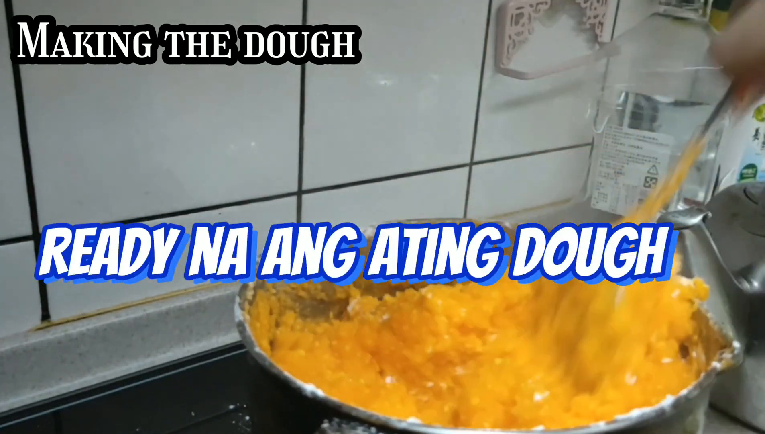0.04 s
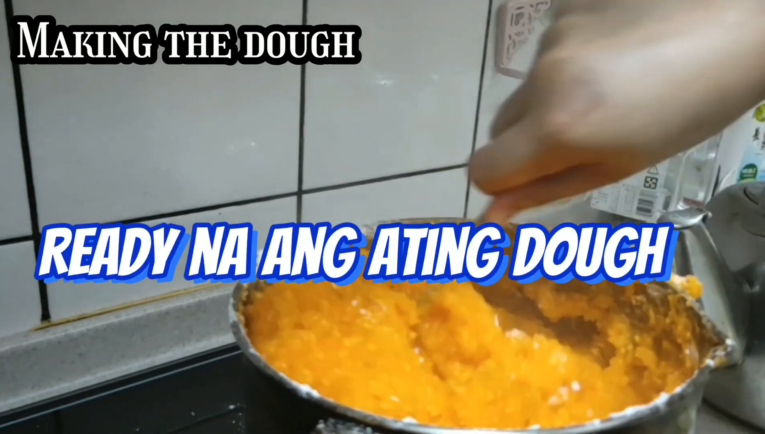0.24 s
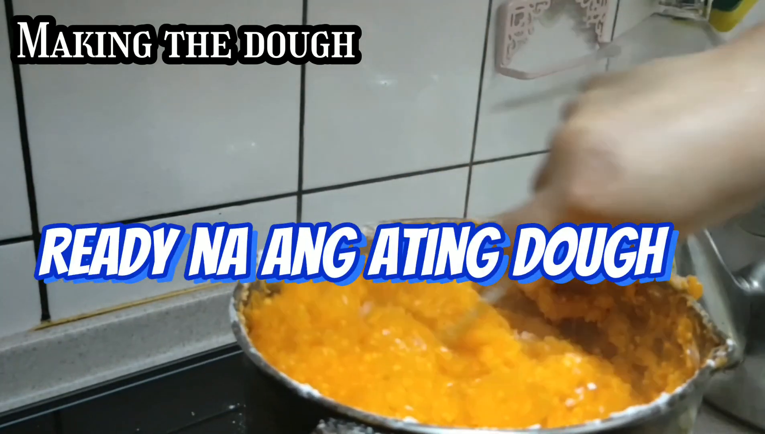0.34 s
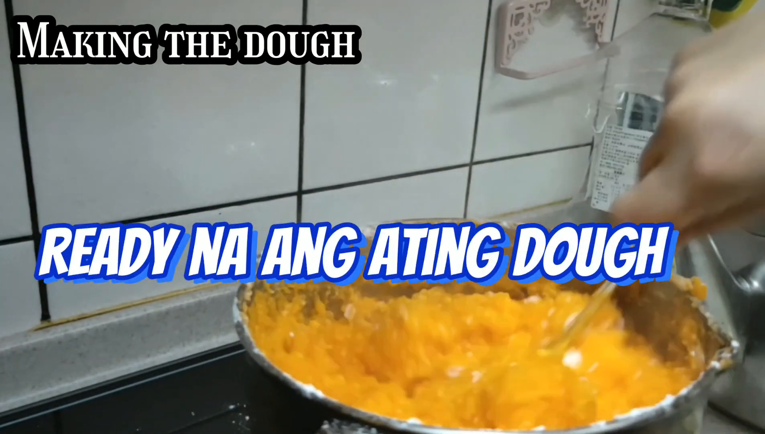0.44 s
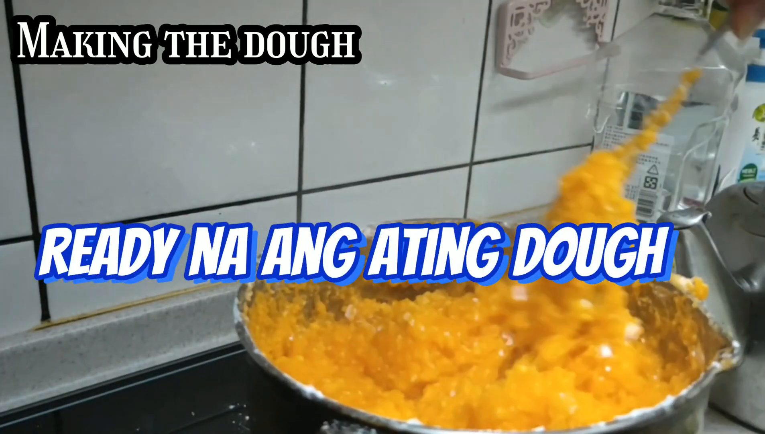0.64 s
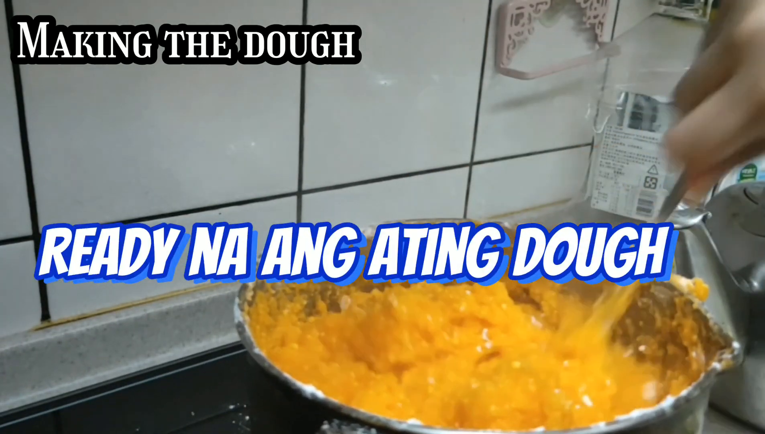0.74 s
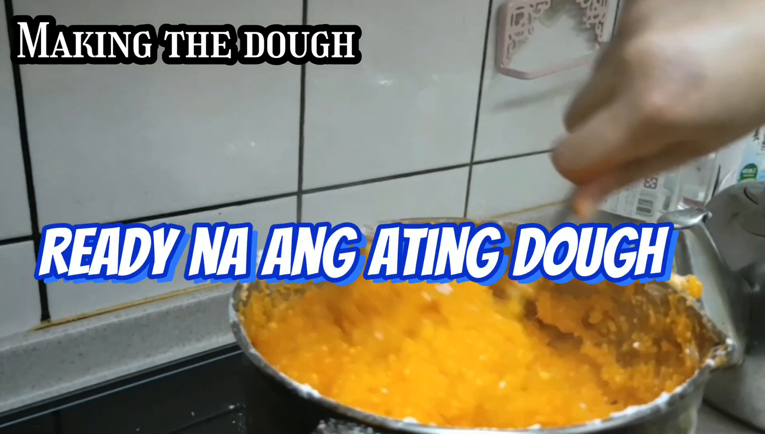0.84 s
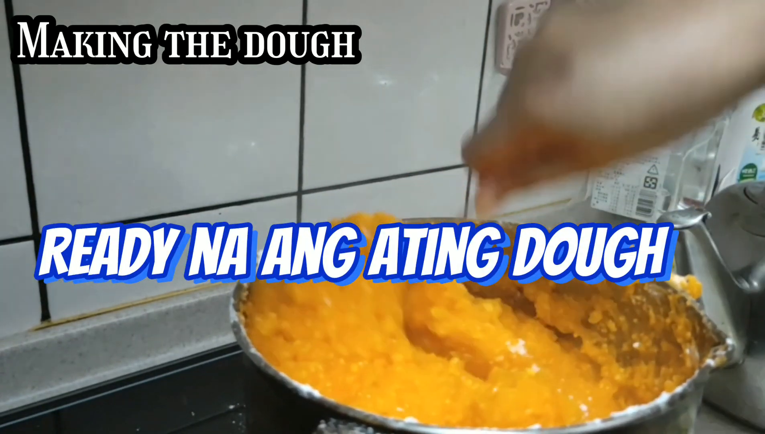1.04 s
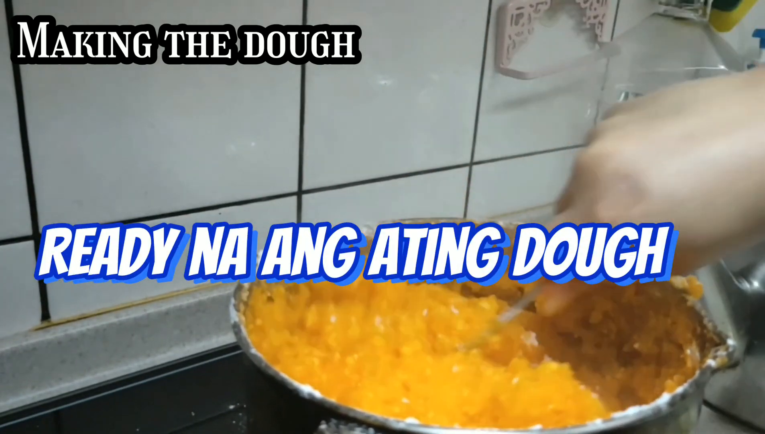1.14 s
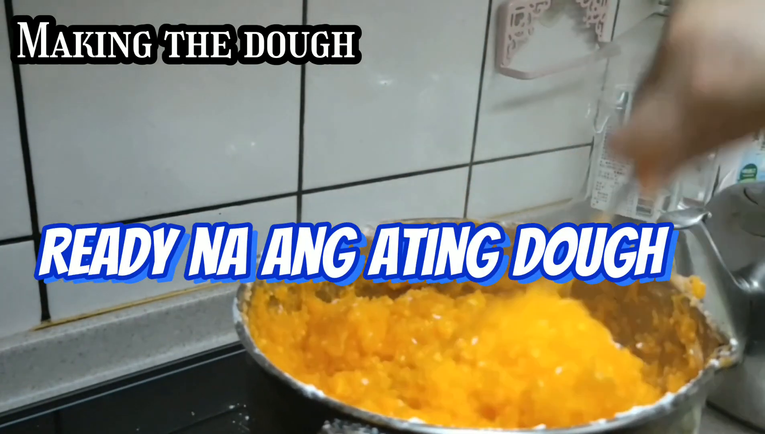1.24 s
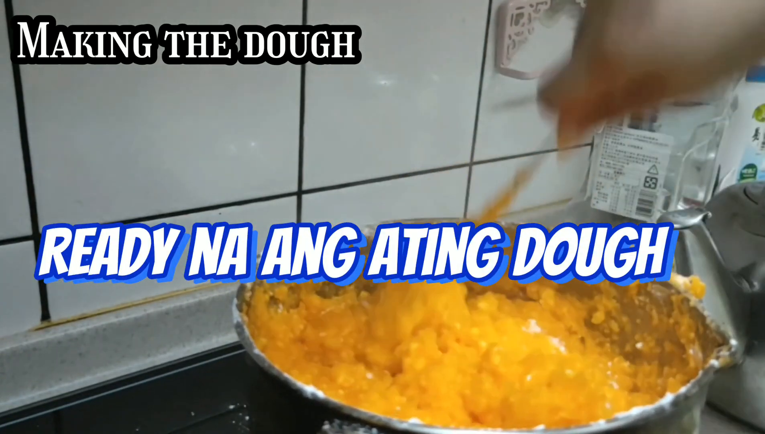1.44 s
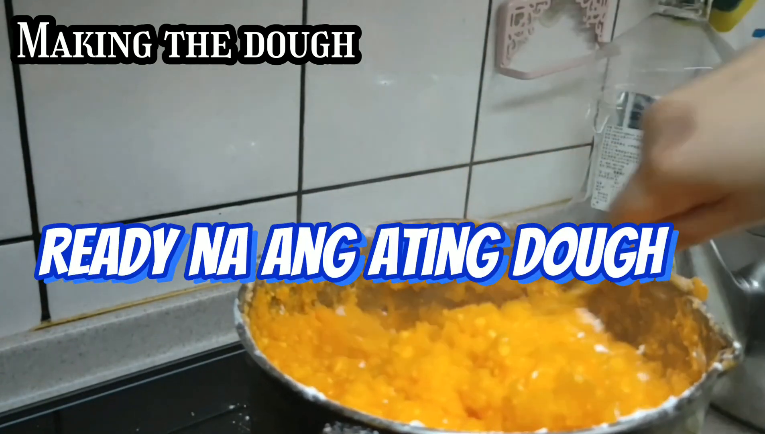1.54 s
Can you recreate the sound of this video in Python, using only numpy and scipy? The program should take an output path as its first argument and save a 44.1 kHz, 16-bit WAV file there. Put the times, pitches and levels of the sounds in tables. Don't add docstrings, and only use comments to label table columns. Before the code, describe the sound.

Thick dough being stirred in a metal pot, with irregular dull knocks, soft thuds and short scrapes

```python
import sys
import numpy as np
from scipy import signal
from scipy.fft import rfft, irfft, next_fast_len
from scipy.io import wavfile
from scipy.ndimage import uniform_filter1d

SR = 44100
rng = np.random.default_rng(int(sys.argv[2]) if len(sys.argv) > 2 else 0)


def wav_record(signal):
    frames = np.transpose(np.atleast_2d(signal))
    bounded = np.clip(frames, -1, 1)
    quanta = np.round(bounded * 32767).astype(np.int16)
    wavfile.write(sys.argv[1], SR, quanta)


def field_ratio(decibels):
    return 10 ** (np.asarray(decibels, dtype=float) / 20)


N = 70560

# frequency in Hz, t60 in seconds, level in dB when knocked, level in dB when thudded.
POT_MODES = [(103, 0.087, -7.5, -9), (144, 0.11, -9, -10.5), (211.5, 0.024, -8.5, 1),
             (265.2, 0.064, -6, -1.5), (392.8, 0.033, 0.5, 1.5), (543, 0.046, 1, -2),
             (651, 0.033, -7.5, -4), (859, 0.023, -1.5, 8), (993, 0.023, 2.5, 6.5), (1160, 0.039, 2, 4.5),
             (1340, 0.023, -0.5, 8), (1738, 0.058, -15, -2), (2065, 0.02, 0.5, -14),
             (3040, 0.029, -21, -11)]
KNOCKED_DB, THUDDED_DB = np.array(POT_MODES).T[2:]


def unit(x):
    return x / np.sqrt(np.mean(x ** 2))


def fade(t, t60):
    return (t >= 0) * field_ratio(-60 * np.maximum(t, 0) / t60)


def butter(x, order, hz, kind="low"):
    return signal.sosfilt(signal.butter(order, hz, kind, fs=SR, output="sos"), x)


def shape(x, points, lag=0):
    n = next_fast_len(len(x) + 4096)
    f = np.arange(n // 2 + 1) * SR / n + 1
    hz, db = np.array(points).T
    gain = field_ratio(np.interp(np.log(f), np.log(hz + 1), db))
    delay = np.exp(-2j * np.pi * f * lag / SR)
    return irfft(rfft(x, n) * gain * delay, n)[:len(x)]


def walk(rate):
    k = int(SR / rate)
    return unit(uniform_filter1d(uniform_filter1d(rng.standard_normal(N), k), k))


def hum():
    # frequency in Hz, level in dB per Hz.
    hum_colour = [(25, -11), (90, 11.5), (200, -7.5), (400, -9), (2000, -37), (7000, -51), (14000, -54)]
    level_db = -66
    first, second = [field_ratio(level_db) * unit(shape(rng.standard_normal(N), hum_colour)) for _ in range(2)]
    return first, 0.75 * first + 0.23 * second


def grit():
    grains_per_s, spread_db = 12000, 1.2
    hit = rng.random(N) < grains_per_s / SR
    size = field_ratio(spread_db * rng.exponential(size=N))
    return unit(hit * rng.standard_normal(N) * size)


def pot_wall(force, gains_db):
    out = 0
    for k, ((hz, t60, *_), db) in enumerate(zip(POT_MODES, gains_db)):
        pole = np.exp(2j * np.pi * hz / SR - np.log(1000) / (t60 * SR))
        ring = signal.lfilter([1], [1, -pole], force).imag
        out = out + (-1) ** k * field_ratio(db) * ring
    return out


def dough_drag():
    # time in seconds, load in dB, contact in ms.
    drag = [(0, -50, 1.37), (0.052, -62.5, 0.39), (0.121, -67.5, 5.5), (0.221, -67.5, 2.5),
            (0.402, -45.5, 1), (0.532, -52.5, 0.95), (0.619, -50.5, 1.14), (.7, -72, 1.7), (.76, -76, 1.9),
            (.86, -66.5, 0.34), (1.0, -53, 2.3), (1.068, -47.5, 0.32), (1.13, -56.5, 0.28),
            (1.161, -62.5, 0.16), (1.243, -35.5, 0.44), (1.288, -60, 0.54), (1.431, -62.5, 2.64),
            (1.6, -65.5, 4.7)]
    seconds, load_db, contact_ms = np.array(drag, float).T
    t = np.arange(N) / SR
    ring = pot_wall(grit() * field_ratio(1.5 * walk(30)), THUDDED_DB)
    steps_ms = np.array([.25, .5, 1, 2, 4])
    versions = [unit(butter(ring, 3, 500 / ms)) for ms in steps_ms]
    versions[0] = unit(butter(versions[0], 2, 600, "high"))
    contact = np.clip(np.interp(t, seconds, contact_ms), .25, 4)
    place = np.interp(np.log(contact), np.log(steps_ms), np.arange(5))
    mix = sum(np.sqrt(np.clip(1 - abs(place - k), 0, 1)) * v for k, v in enumerate(versions))
    return mix * field_ratio(np.interp(t, seconds, load_db))


def resonances(x, table):
    out = 0
    for k, (hz, width, db) in enumerate(table):
        b, a = signal.iirpeak(hz, hz / width, fs=SR)
        twice = signal.lfilter(b, a, signal.lfilter(b, a, x))
        out = out + (-1) ** k * field_ratio(db) * twice
    return out


def spoon_edge(x, bright_db):
    # frequency in Hz, width in Hz, level in dB.
    low_modes = [(1375, 1500, -2.5), (1944, 895, 4), (2272, 470, 5.5), (2870, 1480, 0.5)]
    # frequency in Hz, width in Hz, level in dB.
    high_modes = [(4580, 2630, -11.5), (5290, 1380, -3.5), (6943, 2270, -4), (8020, 2660, -8.5),
                  (10600, 3700, -19.5), (14950, 2900, -26)]
    return 4 * (resonances(x, low_modes) + field_ratio(bright_db) * resonances(x, high_modes))


def sliding():
    # time in seconds, pressure in dB, brightness in dB.
    slide = [(0, -66, 0.5), (.14, -69, 7.5), (0.202, -71.5, 19), (0.229, -74, 12.5), (0.448, -61, -12),
             (.515, -76, 9.5), (0.564, -60, 3.5), (0.601, -65.5, -0.5), (0.699, -79.5, 5.5),
             (0.754, -72, -53), (.86, -65.5, 8), (0.998, -65, -2.5), (1.07, -66, 6.5), (1.17, -66.5, 6),
             (1.3, -66, 0.5), (1.431, -83.5, 5.5), (1.558, -60.5, 11.5), (1.6, -61.5, 12)]
    seconds, pressure_db, bright_db = np.array(slide, float).T
    flicker_db = 1.5
    t = np.arange(N) / SR
    noise = grit() * field_ratio(flicker_db * walk(40))
    rubbed = spoon_edge(noise, np.interp(t, seconds, bright_db))
    return field_ratio(np.interp(t, seconds, pressure_db)) * rubbed


def strikes(table, modes_db):
    strike_spread_db, rattle_db, clink_t60_s = 1.5, -8, 0.016
    out = np.zeros(N)
    t = np.arange(SR // 4) / SR
    spots = rng.standard_normal((len(table), len(POT_MODES)))
    noise = grit()
    for (start, db, ms, t60, clink_db), spot in zip(table, spots):
        i = int(start * SR)
        rough = np.resize(noise[i:], len(t))
        phase = t / ms * 1000
        push = phase * np.exp(-phase * 2)
        force = (t == 0) + field_ratio(rattle_db - 18) * rough * fade(t, t60)
        force = signal.fftconvolve(force, push / push.sum())[:len(t)]
        body = pot_wall(force, modes_db + strike_spread_db * spot) * 0.45
        clink = spoon_edge(rough * (fade(t, clink_t60_s) + 0.093 * fade(t, t60 * 2)), 0)
        out[i:i + len(t)] += (field_ratio(db) * (body + field_ratio(clink_db) * clink))[:N - i]
    return out


def wall_knocks():
    # start in seconds, level in dB, contact in ms, rattle t60 in seconds, clink in dB.
    bare_knocks = [
        (.2388, -18, 0.19, 0.12, -8.5),
        (.3930, -22, 0.24, 0.069, -30),
        (0.774, -29.5, 0.4, 0.21, -34),
        (.8882, -15, 0.17, 0.048, -6),
        (1.1856, -21, 0.21, 0.11, -28),
    ]
    return strikes(bare_knocks, KNOCKED_DB)


def dough_thuds():
    # start in seconds, level in dB, contact in ms, rattle t60 in seconds, clink in dB.
    soft_thuds = [(.3030, -17.5, 0.65, 0.15, -57), (.3090, -19, 0.62, .12, -18.5),
                  (.336, -32.5, 0.66, 0.034, -42), (.5640, -30.5, 0.53, 0.18, -21),
                  (.9270, -21, 0.46, 0.083, -19.5), (.9325, -20, 0.54, 0.16, -48),
                  (.951, -39.5, 0.33, 0.2, -12), (.965, -48, 1.2, 0.046, -25), (1.21, -24, 1, 0.066, -50),
                  (1.3250, -24.5, 1.7, .25, -45), (1.355, -34.5, 1.37, 0.1, -36)]
    return strikes(soft_thuds, THUDDED_DB)


def scrapes():
    # start in seconds, hold in seconds, release t60 in seconds, level in dB, brightness in dB.
    scrape_events = [
        (0.3283, .0155, 0.044, -53, 11.5),
        (0.423, 0.011, 0.27, -60.5, 3.5),
        (0.7642, 0.0049, 0.23, -40, 1.5),
        (0.926, 0.017, 0.13, -51.5, 5.5),
        (1.1792, 0.0061, 0.11, -54, 13.5),
        (1.21, 0.026, 0.095, -51, 6),
    ]
    attack_s = .003
    t = np.arange(N) / SR
    out = np.zeros(N)
    for start, hold, t60, db, bright_db in scrape_events:
        release = np.where(t < start + hold, 1, fade(t - start - hold, t60))
        env = np.clip((t - start) / attack_s, 0, 1) * release
        out = out + field_ratio(db) * spoon_edge(env * grit(), bright_db)
    return out


def kitchen(x):
    early_t60_s, late_t60_s, late_db = 0.015, 0.21, -19.5
    t = np.arange(SR // 4) / SR
    decay = fade(t - .0006, early_t60_s) + field_ratio(late_db) * fade(t - .003, late_t60_s)
    tail = rng.standard_normal((2, len(t))) * decay
    tail = np.array([[1, .4], [-1, .4]]) @ tail
    tail = tail / np.sqrt((tail ** 2).sum(1, keepdims=True))
    return signal.fftconvolve(x[None], butter(tail, 2, 550, "high"))[:, :N]


def scene():
    # frequency in Hz, left minus right port in dB.
    port_difference = [(40, 23), (125, -1.5), (300, 7.5), (700, 5), (2000, 4), (4500, 3.5), (8000, 3.5),
                       (13000, -1)]
    lag_samples, room_db = 5.25, -1.5
    pot = dough_drag() + sliding() + wall_knocks() + dough_thuds() + scrapes()
    wet = field_ratio(room_db) * kitchen(pot)
    hum_left, hum_right = hum()
    half = np.array(port_difference, float) * [1, .5]
    left = shape(pot + wet[0], half) + hum_left
    right = shape(pot + wet[1], half * [1, -1], lag_samples) + hum_right
    return np.array([left, right])


def treble_gate(x):
    # frequency in Hz, limit in dB relative to the loudest band of the moment.
    gate_limits = [(2500, -60), (4100, -27), (4900, -32), (6500, -55), (8600, -50), (9400, -31),
                   (11500, -38), (15500, -50)]
    depth_db, scatter_db = -28, 8
    width = 16
    f, _, z = signal.stft(x, SR, nperseg=1536, noverlap=1024)
    power = np.add.reduceat((abs(z) ** 2).sum(0), np.arange(0, len(f), width)) + 1e-18
    under_db = 10 * np.log10(power / power.max(0))
    hz, db = np.array(gate_limits, float).T
    limit_db = np.interp(f[::width], hz, db, left=-200)[:, None]
    chance = uniform_filter1d(rng.standard_normal(power.shape), size=3, axis=1) * np.sqrt(3)
    shut = under_db + scatter_db * chance < limit_db
    gain = field_ratio(depth_db * shut)[np.arange(len(f)) // width]
    return signal.istft(z * gain, SR, nperseg=1536, noverlap=1024)[1][:, :N]


def top_cut(x):
    return signal.sosfilt(signal.butter(12, 16120, fs=SR, output="sos"), x)


def record(dry):
    low_hz, top_hz = 69.4, 15700
    x = butter(dry, 3, low_hz, "high")
    x = signal.sosfilt(signal.ellip(8, .2, 50, top_hz, fs=SR, output="sos"), x)
    return top_cut(treble_gate(x))


dry = scene()
out = record(dry)
wav_record(out)
```